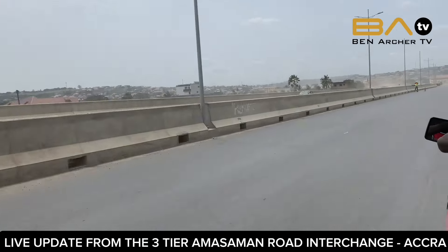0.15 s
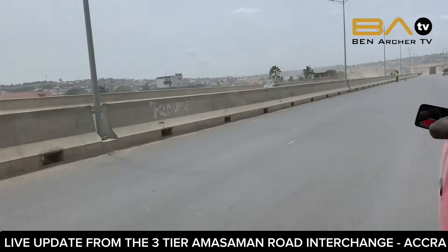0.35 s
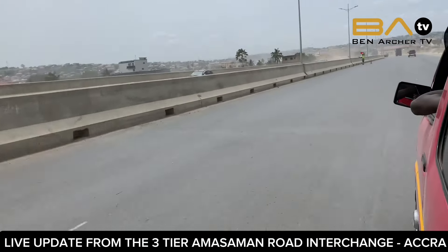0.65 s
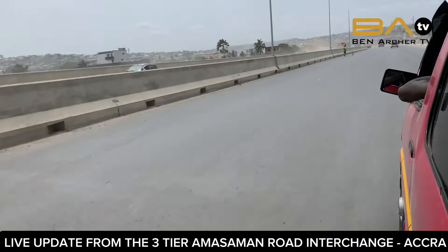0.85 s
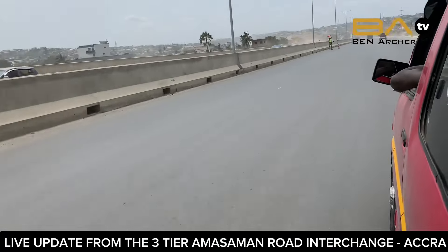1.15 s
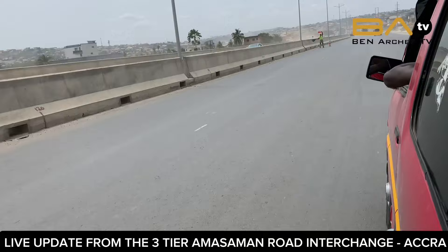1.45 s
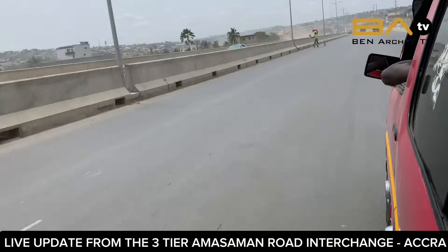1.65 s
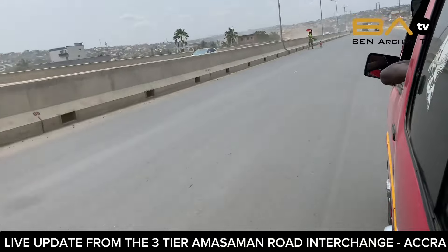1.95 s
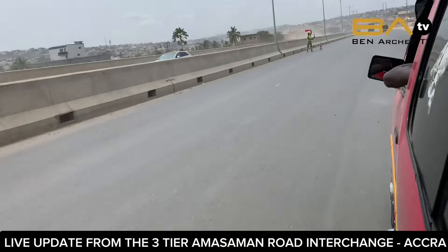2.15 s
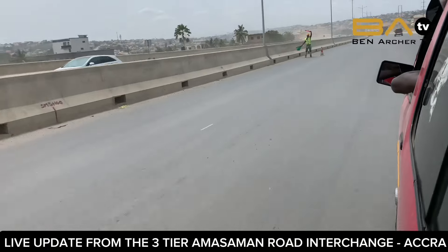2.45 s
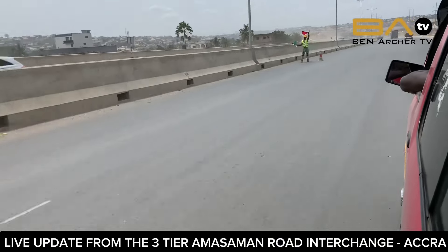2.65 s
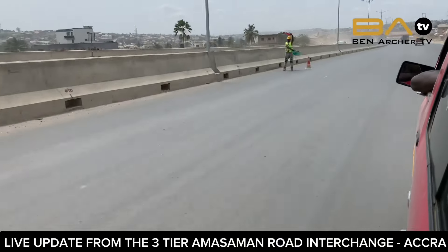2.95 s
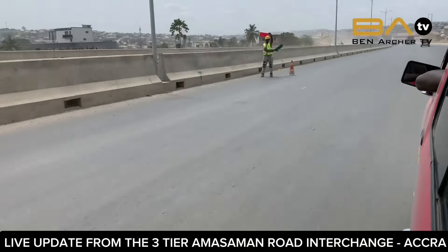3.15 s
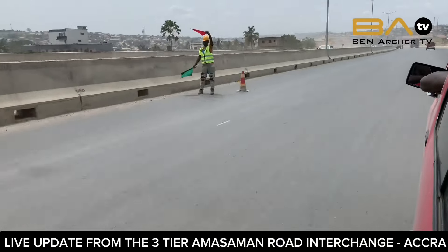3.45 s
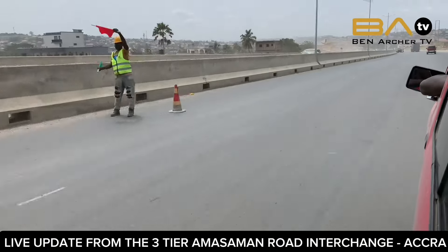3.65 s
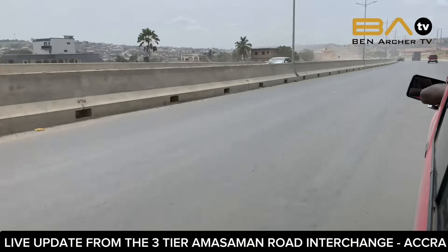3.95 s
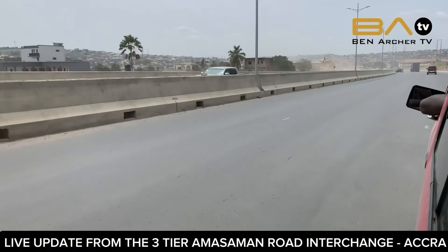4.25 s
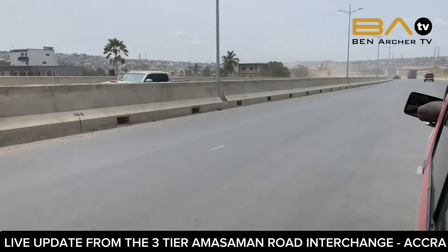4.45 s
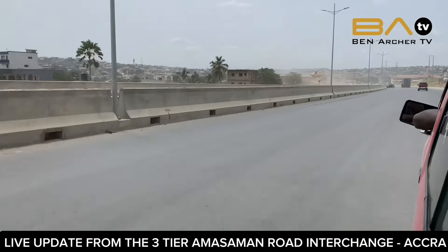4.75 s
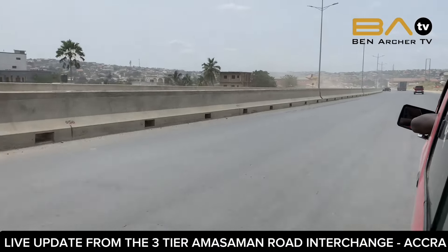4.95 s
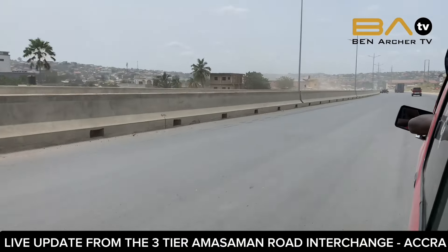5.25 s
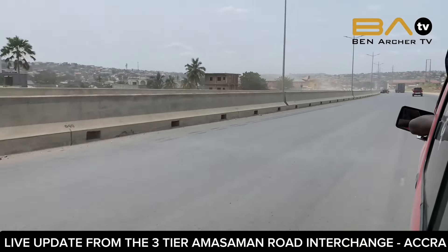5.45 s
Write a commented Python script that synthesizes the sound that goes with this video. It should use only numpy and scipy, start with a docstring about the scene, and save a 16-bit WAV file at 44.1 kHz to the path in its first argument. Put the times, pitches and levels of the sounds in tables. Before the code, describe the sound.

Harsh wind tears and rumbles irregularly across an exposed microphone on a moving car, over a steady tyre hum.

```python
"""Wind tears at once, rasping and crackling, across the two microphone ports of a camera held out of a car window.
Each gust is noise shaped by a passing peak of power: a rasping, crackling front, then a flap and a deep rumble.
Small random eddies ride on the draught that runs on under the gusts.
Underneath lie the steady noise of the tyres and the swelling roar of a car passing the other way.
The bass is narrowed to the centre below a moving edge, a limiter holds the peaks and a low-pass trims the top."""
import sys
import numpy as np
from scipy import signal
from scipy.fft import rfft, irfft
from scipy.io import wavfile
from scipy.ndimage import uniform_filter1d, minimum_filter1d

SR = 44100
rng = np.random.default_rng(int(sys.argv[2]) if len(sys.argv) > 2 else 0)


def to_wav(sig):
    """Store sig (one row per channel, or 1-D mono) as 16-bit WAV at the path in sys.argv[1].

    Samples outside -1..1 are clipped; the rate is SR.
    """
    pcm = np.clip(np.atleast_2d(sig), -1, 1) * 32767
    pcm = np.round(pcm).astype(np.int16)
    wavfile.write(sys.argv[1], SR, pcm.T)  # frames by channels


N = 246959
TIME, FREQ = np.arange(N) / SR, np.fft.rfftfreq(N, 1 / SR)

# Gusts that hit the microphone, levels ahead of the layer mix:
# (time [s], length [s], rasp [dB], crackle [dB relative to rasp], rumble [dB relative to rasp])
GUST_TABLE = [(.001,.014,-13.5,-7.5,-32), (0.037,0.0034,-24,3,-4), (0.116,0.046,-16.5,-13,-8),
              (0.205,.012,-20,-16,-3), (0.237,0.017,-13,-15.5,-5), (0.258,0.0099,-19.5,-5.5,-8),
              (0.354,0.035,-17.5,-13.5,-9), (0.436,0.01,-16.5,-10.5,3.5), (.467,0.019,-25,-7,-5),
              (.546,0.016,-19.5,-7.5,-1), (0.634,0.025,-23.5,-5.5,7.5), (0.683,0.012,-29.5,-3.5,8),
              (0.722,.013,-19,-13.5,-13), (.797,0.025,-20.5,-11,4.5), (0.84,0.013,-15.5,-9.5,-6.5),
              (0.928,0.013,-19,-13.5,3.5), (1.017,0.029,-25,-9,4), (1.162,.015,-27,-18,9),
              (1.237,0.033,-23.5,-4.5,8), (1.343,0.028,-18,-10.5,5.5), (1.496,0.015,-15.5,-25,5),
              (1.578,0.018,-17.5,-15,5), (1.614,0.022,-15,-4.5,-1.5), (1.643,0.015,-23,4.5,5),
              (1.702,0.016,-19.5,-8,0.5), (1.76,0.02,-26,-13.5,7), (1.82,0.006,-13,-13,2),
              (1.869,0.0071,-16.5,-18,4.5), (1.913,0.0087,-16,-19.5,-7), (1.937,0.029,-18.5,-24,5.5),
              (1.976,0.0052,-14,-10.5,-3), (1.993,0.005,-22.5,-10,7), (2.013,0.014,-26,-11,13),
              (2.07,.018,-22,-16.5,-3), (2.115,0.011,-16.5,-12.5,0), (2.143,0.011,-11,-14.5,4),
              (2.23,0.0068,-39,-40,17), (2.272,0.0054,-37,-39,23), (2.328,.006,-15,-11,-3),
              (2.356,0.019,-19,-10,4.5), (2.423,0.0048,-14,-14,1), (2.454,0.02,-11,-15.5,-7),
              (2.501,0.026,-23.5,-19,11), (2.596,0.015,-14,-11,0), (2.644,0.027,-23,-19.5,10),
              (2.694,0.014,-17.5,-16,8.5), (2.728,0.012,-14.5,-20,-3.5), (2.809,0.02,-14,-12,5),
              (2.837,0.027,-17,-22,-24), (2.906,0.007,-14,-17.5,3), (2.93,0.037,-21.5,-19,8),
              (2.981,.011,-16,-11,-1), (3.022,0.01,-12.5,-7,4.5), (3.054,.004,-23.5,-7,4),
              (3.074,.006,-18.5,-10,2), (3.105,0.027,-19,-21,1.5), (3.202,0.012,-21,-17,-11),
              (3.267,0.0043,-19,-27,3), (3.285,0.013,-25,-36,11.5), (3.335,0.011,-16,-35,2.5),
              (3.359,0.022,-14.5,-15,1.5), (3.458,.014,-17,-13.5,0.5), (3.486,0.012,-16,-7.5,5),
              (3.574,.019,-22,-10,4), (3.844,0.014,-22,-21,7), (3.896,0.023,-22.5,-41,1),
              (3.933,0.022,-19,-15.5,8), (4.007,0.002,-13.5,-15,0), (4.087,0.0085,-18.5,-43,3.5),
              (4.12,0.024,-17.5,-14,-0.5), (4.152,0.015,-23.5,-12,11.5), (4.182,0.0056,-19,-14.5,-8),
              (4.202,0.0052,-18,-16,-1), (4.276,0.013,-27.5,-24,13), (4.344,0.012,-5.5,-15.5,-3.5),
              (4.365,0.025,-20,-39,7), (4.478,0.028,-23,-26,6), (4.525,0.0086,-26,-11,15.5),
              (4.575,.01,-36,-9,9), (4.645,0.024,-21,-47,6.5), (4.788,0.013,-24,-42,13),
              (4.846,0.012,-24,-17,-3), (4.992,0.011,-26.5,-47,-1.5), (5.05,0.013,-17,-25,-7),
              (5.149,.009,-18.5,-40,-9), (5.202,0.05,-16.5,-29.5,-20), (5.226,0.0029,-19,-10,4),
              (5.244,0.0043,-13.5,-7.5,5), (5.266,0.021,-15,-14.5,-1), (5.333,.014,-17,-19,-4),
              (5.419,0.0022,-14.5,-23.5,-5), (5.478,0.0045,-12,-17,5), (5.495,0.015,-22,-19,4),
              (5.53,0.21,-23.5,-26,-11), (5.6,0.047,-16,-12.5,10)]


def gain_of(db):
    """Decibels to amplitude."""
    return 10 ** (np.asarray(db) / 20)


def evened(x):
    """Scales to rms 1."""
    return x / np.sqrt(np.mean(x ** 2) + 1e-20)


def read(points):
    """Interpolates a table of (frequency [Hz], value) on a log-frequency axis."""
    hz, value = np.transpose(points)
    return np.interp(np.log(FREQ + 1), np.log(hz + 1), value)


def smooth(x, hz):
    """Gaussian low-pass without delay."""
    return irfft(rfft(x) * np.exp(-0.5 * (FREQ / hz) ** 2), N)


def port_noise(colour):
    """Coloured noise at two ports, partly alike by frequency; the treble reaches the right port first."""
    # likeness of the sound at the two ports: (frequency [Hz], likeness [0-1])
    likeness = [(30, 0.46), (400, 0.65), (700, 0), (1500, 0.17), (4000, 0.19), (6000, 0.43), (8000, 1),
                (15000, 1)]
    # the left port faces the wind more: (frequency [Hz], left minus right [dB])
    left_lean = [(300, 0.5), (550, 0), (1000, 3), (2000, 5), (3200, 5), (4500, 6), (5500, -1), (15000, 1.2)]
    lag_s, treble_hz = 8 / SR, 2200
    left, other = rfft(rng.standard_normal((2, N)))
    alike = np.clip(read(likeness), 0, 1)
    lead = np.exp(2j * np.pi * FREQ * lag_s * (FREQ > treble_hz))
    right = alike * left * lead + np.sqrt(1 - alike ** 2) * other
    lean = gain_of(read(left_lean) / 2)
    spectra = np.array([left * lean, right / lean]) * gain_of(read(colour))
    return evened(irfft(spectra, N))


def swirl(colour, steady_hz):
    """Turbulent pressure whose strength is held steady over spans longer than one eddy."""
    x = port_noise(colour)
    slow_power = np.abs(smooth(x.mean(0) ** 2, steady_hz))
    return evened(x / np.sqrt(slow_power + 0.015))


def sputter(hz, shared_db, own_db):
    """Turbulence comes in spurts of bounded size: a random gain, part common to the ports, part their own."""
    spurts = evened(smooth(rng.standard_normal((3, N)), hz))
    spurts = evened(2 * np.tanh(spurts / 2))
    return evened(gain_of(shared_db * spurts[0] + own_db * spurts[1:]))


def mottled(x, patchy_db, frames_size, bins_size):
    """No two eddies have the same colour: random patches of emphasis drift over time and pitch."""
    spectrum = signal.stft(x, SR, nperseg=256, noverlap=192)[2]
    patches = rng.standard_normal(spectrum.shape[1:])  # the same for both ports
    patches = uniform_filter1d(patches, frames_size, axis=1)
    patches = evened(uniform_filter1d(patches, bins_size, axis=0))
    coloured = spectrum * gain_of(patchy_db * patches)
    return evened(signal.istft(coloured, SR, nperseg=256, noverlap=192)[1][:, :N])


def steeper(strength, pivot_db, power):
    """Grows faster than the eddy that drives it, and equals it at the pivot."""
    pivot = gain_of(pivot_db)
    return pivot * (strength / pivot) ** power


def draught():
    """Level of the airflow between gusts: (rumble [dB], rasp [dB])."""
    # airflow, levels ahead of the layer mix: (time [s], rumble [dB], rasp [dB])
    airflow = [(0.0, -14.5, -28.5), (0.6, -24, -28), (0.9, -26.5, -36), (1.25, -19, -30),
               (1.44, -34, -38.5), (1.95, -24, -30.5), (2.25, -21, -32.5), (2.75, -23, -36.5),
               (3.1, -15.5, -28.5), (3.45, -23, -41), (3.75, -18.5, -33), (4.05, -23, -35.5),
               (4.4, -18.5, -34), (4.9, -21, -33), (5.2, -16, -33), (5.4, -19, -41), (5.6, -22, -21)]
    s, rumble_db, rasp_db = np.transpose(airflow)
    return np.interp(TIME, s, rumble_db), np.interp(TIME, s, rasp_db)


def passing(times, lengths, levels_db, draught_db):
    """Strength of the wind: each eddy is a peak of power, steeper in front, on top of the draught."""
    lopsided = 0.17  # a gust dies more slowly than it rises
    pointed = 1.47  # 1 is a spike, 2 a round bell
    power = gain_of(draught_db) ** 2
    for s, length, db in zip(times, lengths, levels_db):
        near = slice(*np.searchsorted(TIME, [s - 3 * length, s + 4 * length]))
        age = TIME[near] - s
        width = length * (1 + lopsided * np.sign(age))  # full width at half power
        power[near] += gain_of(db) ** 2 * 0.5 ** (np.abs(2 * age / width) ** pointed)
    return np.sqrt(power)


def small_eddies(draught_db, count=200):
    """Brief eddies at random moments, levelled to the draught: rows (s, length s, rasp dB, crackle dB)."""
    per_s, mean_length_s = 18, 0.0097
    above_draught_db, scatter_db, crackle_db = 2.5, 2, -25  # the crackle is relative to the eddy's rasp
    wait, size, strength, bright = rng.random((count, 4)).T
    s = np.cumsum(-np.log(1 - wait)) / per_s
    length = mean_length_s * (0.5 + size)
    db = np.interp(s, TIME, draught_db) + above_draught_db + scatter_db * (2 * strength - 1)
    bright_db = crackle_db + scatter_db * (2 * bright - 1)
    return np.transpose([s, length, db, bright_db])


def rasp(rush):
    """Mid-sized swirls breaking on the ports: patchy, sputtering noise that follows the rush of air."""
    # rasp: (frequency [Hz], relative level per Hz [dB])
    rasp_colour = [(280, -21), (430, 8), (600, 5.5), (800, 1), (1100, 0), (1800, -6), (2700, -14.5),
                   (3800, -26.5), (5500, -39), (9000, -52)]
    grain = mottled(port_noise(rasp_colour), patchy_db=2.0, frames_size=14, bins_size=4)
    return rush * grain * sputter(hz=205, shared_db=3.1, own_db=1.0)


def crackle(rush, fine):
    """Finer swirls in millisecond spurts; they lie between rasp and spits, and follow both."""
    # crackle: (frequency [Hz], relative level per Hz [dB])
    crackle_colour = [(1500, 7), (2700, 2.5), (3900, -0.5), (5400, -12.5), (7500, -13), (10000, -17.5),
                      (15800, -52)]
    strength = fine * (rush / fine) ** 0.41
    grain = mottled(port_noise(crackle_colour), patchy_db=2.0, frames_size=10, bins_size=7)
    return strength * grain * sputter(hz=383, shared_db=3.0, own_db=3.5)


def spits(fine):
    """Bright spits of the finest swirls, growing faster than the eddies that drive them."""
    # spits: (frequency [Hz], relative level per Hz [dB])
    spit_colour = [(3000, -2), (5000, -10), (6800, 0), (8500, -7), (12000, -5), (13000, -19),
                   (15800, -10.5)]
    strength = steeper(fine, pivot_db=-33.5, power=1.23)
    grain = mottled(port_noise(spit_colour), patchy_db=1.5, frames_size=10, bins_size=12)
    return strength * grain * sputter(hz=230, shared_db=5.5, own_db=5.0)


def tearing():
    """The front of each gust and small eddy breaks on the ports as rasp, crackle and spits."""
    crackle_share = 0.8  # of a gust's length
    snap_s, snap_db, body_db = 0.0033, 0, -2.5  # a brief snap at the gust's peak on top of a longer body
    rasp_draught_db = draught()[1]
    crackle_draught_db = rasp_draught_db - 41  # smooth air hardly crackles
    eddies = np.vstack([np.array(GUST_TABLE)[:, :4], small_eddies(rasp_draught_db)])
    s, length, db, bright_db = eddies.T
    rush = passing(s, length, db, rasp_draught_db)
    body = passing(s, crackle_share * length, db + bright_db, crackle_draught_db)
    snap = passing(s, np.full(len(s), snap_s), db + bright_db, crackle_draught_db)
    fine = np.hypot(gain_of(body_db) * body, gain_of(snap_db) * snap)
    treble = gain_of(2) * crackle(rush, fine) + gain_of(-3.5) * spits(fine)
    treble = treble * sputter(hz=70, shared_db=1.87, own_db=-0.5)
    torn = gain_of(-0.68) * rasp(rush) + treble
    return torn * sputter(hz=105, shared_db=2.02, own_db=1.18)


def flap():
    """Middling swirls flap at the ports just after a gust's front and last longer than it."""
    # flap: (frequency [Hz], relative level per Hz [dB])
    flap_colour = [(90, -14), (160, 3.5), (230, 3), (350, -2), (500, -10.5), (660, -22), (1200, -34.5),
                   (2500, -75)]
    lag_s, spread_s = 0.0055, 0.0043
    depth = 0.42  # the level lies between the rasp's (0) and the rumble's (1)
    s, length, db, _, deep_db = np.transpose(GUST_TABLE)
    low_db, high_db = draught()
    draught_db = high_db + depth * (low_db - high_db)
    edge = passing(s + lag_s, np.hypot(length, spread_s), db + depth * deep_db, draught_db)
    strength = steeper(edge, pivot_db=-25.5, power=1.09)
    return strength * swirl(flap_colour, steady_hz=27.3) * sputter(hz=90, shared_db=3.0, own_db=-0.2)


def rumble():
    """The largest swirls shove the ports last and longest."""
    # rumble: (frequency [Hz], relative level per Hz [dB])
    rumble_colour = [(10, -34), (25, -14), (38, -7.5), (52, 4.5), (66, 7), (95, 3), (140, -2.5), (190, -13),
                     (320, -76)]
    lag_s, spread_s = 0.012, 0.015
    s, length, db, _, deep_db = np.transpose(GUST_TABLE)
    push = passing(s + lag_s, np.hypot(length, spread_s), db + deep_db, draught()[0])
    return steeper(push, pivot_db=-17, power=1.21) * swirl(rumble_colour, steady_hz=5.7)


def buffeting():
    """The body of each gust: a flapping edge, then a deep rumble."""
    return gain_of(3.0) * flap() + gain_of(2.0) * rumble()


def road():
    """Steady roar and hiss of the car's own tyres: coloured noise at a constant level."""
    # tyres on asphalt: (frequency [Hz], relative level per Hz [dB])
    tyre_colour = [(40, 9), (150, 34.5), (400, -40), (700, -48), (1050, 10), (2000, -6), (3200, -31),
                   (5000, -22), (11500, -21.5), (13000, -40), (15800, -46)]
    return gain_of(-28) * port_noise(tyre_colour)


def oncoming():
    """Tyre roar that swells and fades with the distance of the other car, behind the barrier."""
    # tyres of the other car: (frequency [Hz], relative level per Hz [dB])
    far_tyre_colour = [(200, -38), (380, -2), (520, 5), (720, 2), (950, -10), (1500, -27), (4000, -53)]
    nearest_s, half_width_s, nearest_db = 4.62, 0.22, -31  # 3 dB down at the half width
    distance = np.hypot(1, (TIME - nearest_s) / half_width_s)  # 1 at the nearest point
    return gain_of(nearest_db) * port_noise(far_tyre_colour) / distance


def centre_bass(ports):
    """The difference between the ports is high-passed at a moving edge, so the bass below it is centred."""
    # edge below which the bass sits in the centre: (time [s], edge [Hz])
    mono_edge = [(0, 8), (1.05, 8.2), (1.11, 500), (1.35, 700), (1.55, 680), (2.2, 770), (2.8, 720),
                 (3.65, 640), (4.0, 510), (4.4, 340), (4.9, 310), (5.2, 196), (5.6, 120)]
    hz, t, side = signal.stft((ports[0] - ports[1]) / 2, SR, nperseg=1024, noverlap=768)
    edge_hz = np.interp(t, *np.transpose(mono_edge))
    side = side / np.sqrt(1 + (edge_hz / (hz[:, None] + 10)) ** 8)  # 10 Hz avoids dividing by zero
    side = signal.istft(side, SR, nperseg=1024, noverlap=768)[1][:N]
    return ports.mean(0) + np.array([side, -side])


def limit(sound):
    """Fast limiter: one gain for both ports dips around each peak above the ceiling."""
    ceiling, span = 0.96, 161  # full scale = 1; samples
    room = ceiling / np.maximum(np.abs(sound).max(0), ceiling)
    gain = uniform_filter1d(minimum_filter1d(room, size=span), size=span)
    return sound * gain


def scene():
    """Wind on the ports over the noise of the road and the other car."""
    return tearing() + buffeting() + road() + oncoming()


def record(dry):
    """The bass is centred, the limiter holds the peaks, then a low-pass sets the upper band edge."""
    limited = limit(centre_bass(dry))
    low_pass = signal.firwin(511, 15900, window=("kaiser", 9), fs=SR)  # edge in Hz
    return signal.oaconvolve(limited, low_pass[None], "same")


dry = scene()
out = record(dry)
to_wav(out)
```